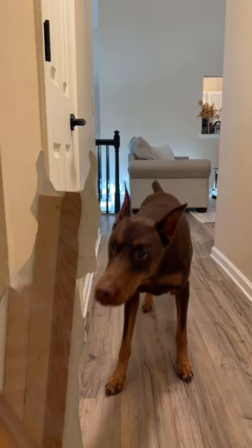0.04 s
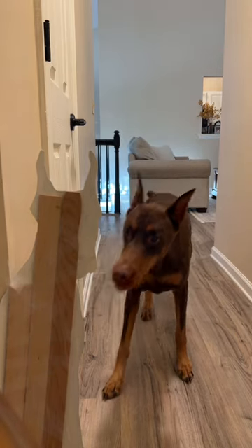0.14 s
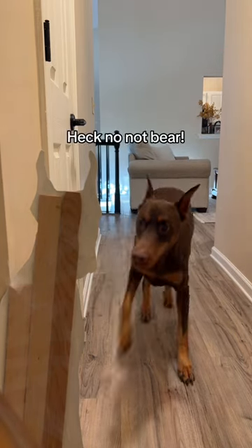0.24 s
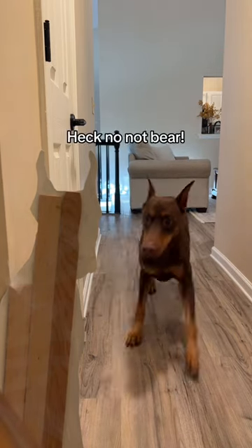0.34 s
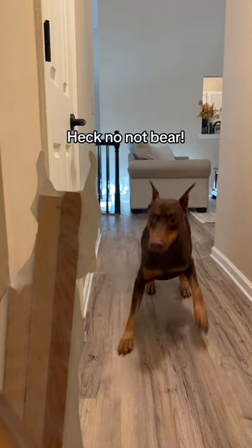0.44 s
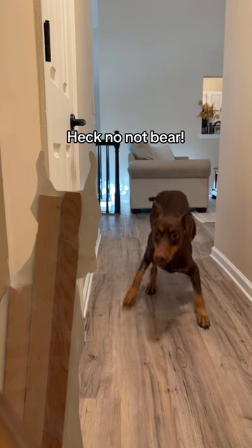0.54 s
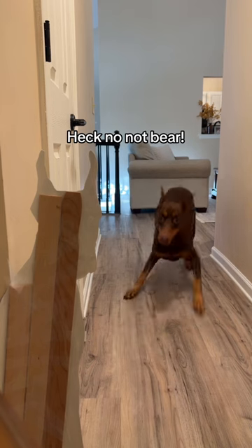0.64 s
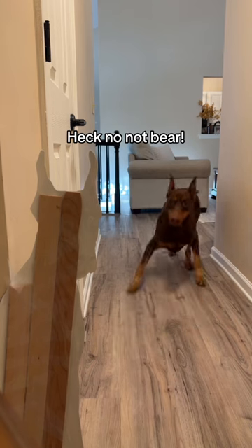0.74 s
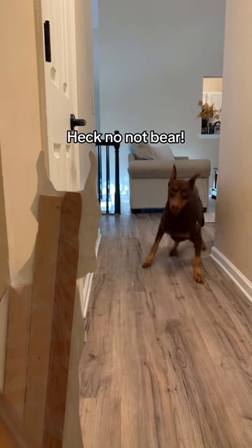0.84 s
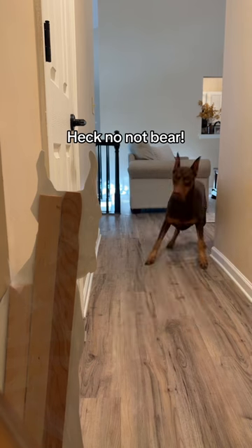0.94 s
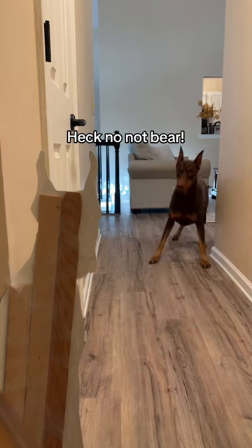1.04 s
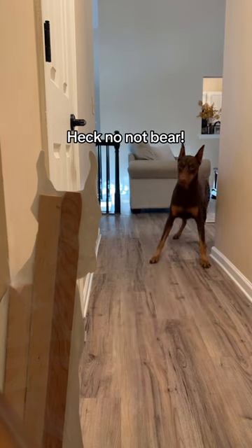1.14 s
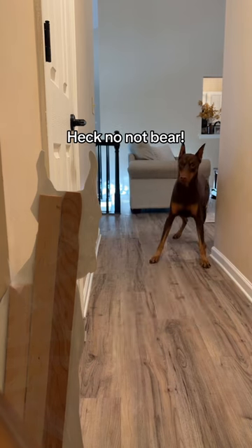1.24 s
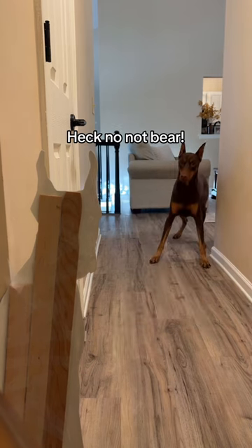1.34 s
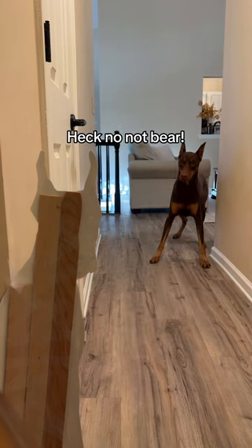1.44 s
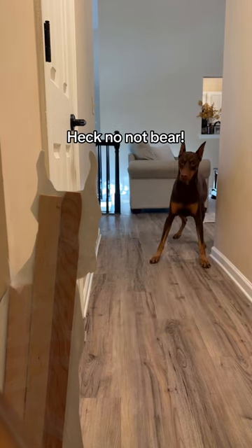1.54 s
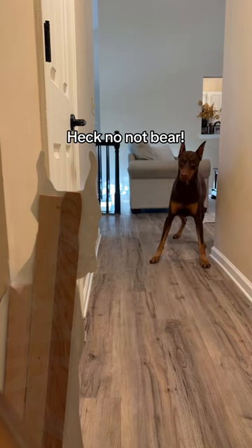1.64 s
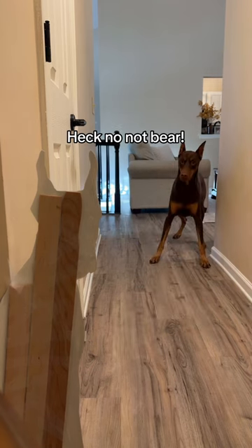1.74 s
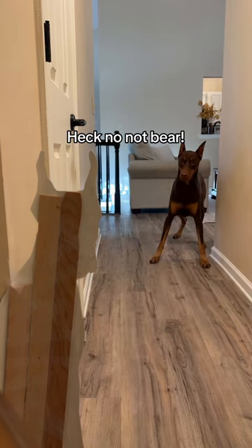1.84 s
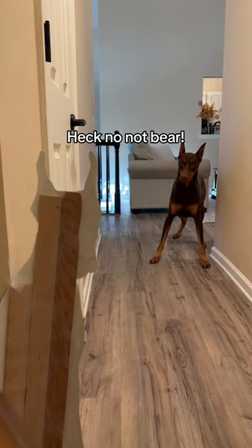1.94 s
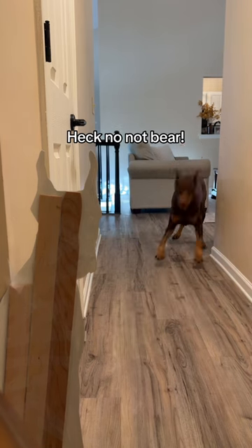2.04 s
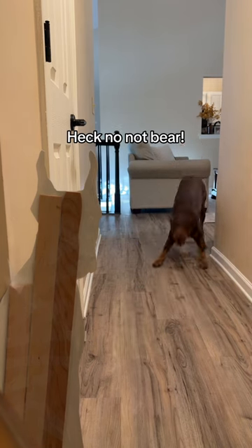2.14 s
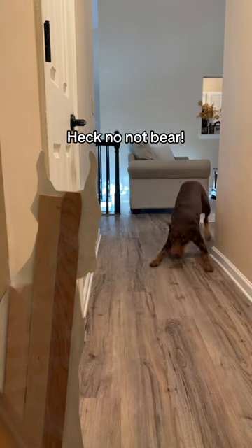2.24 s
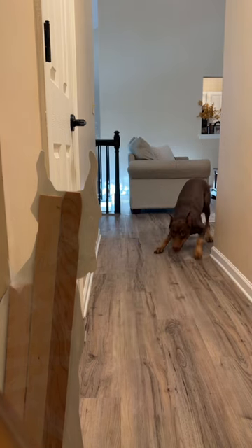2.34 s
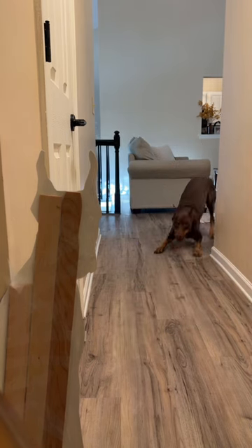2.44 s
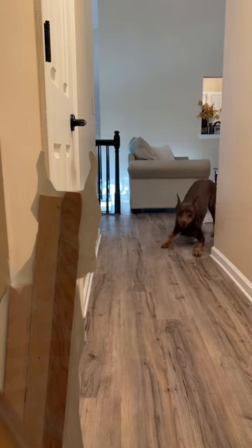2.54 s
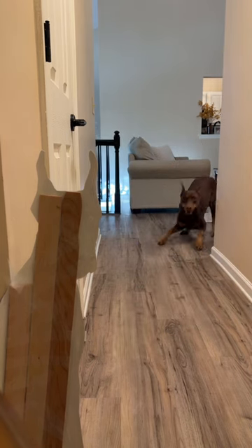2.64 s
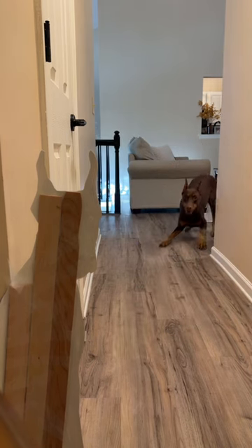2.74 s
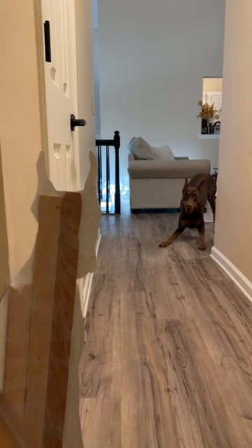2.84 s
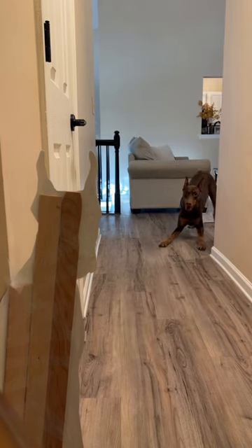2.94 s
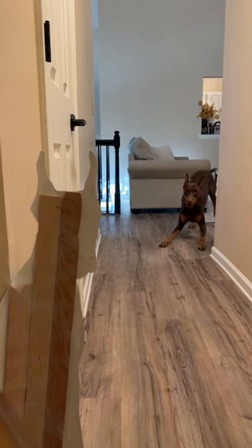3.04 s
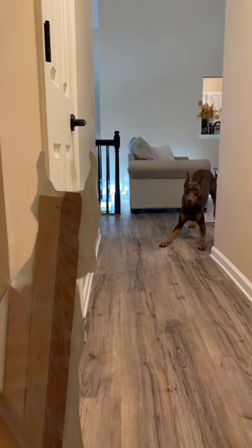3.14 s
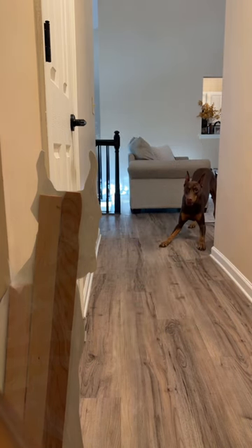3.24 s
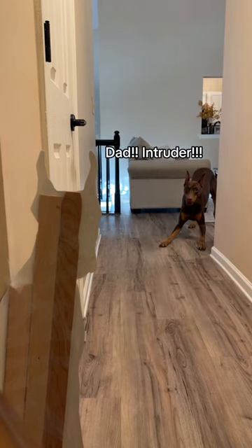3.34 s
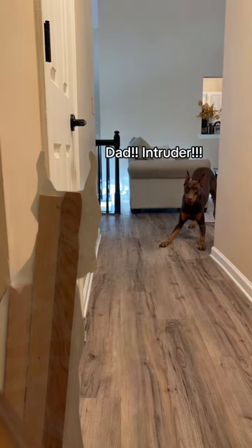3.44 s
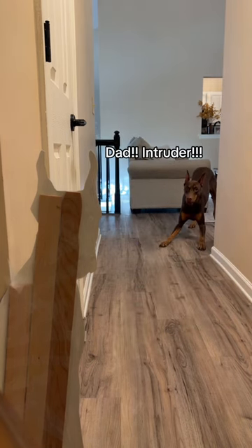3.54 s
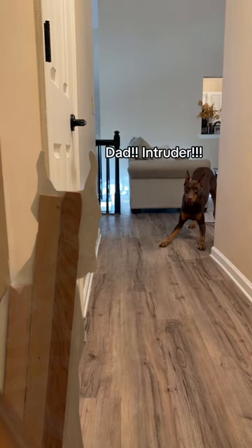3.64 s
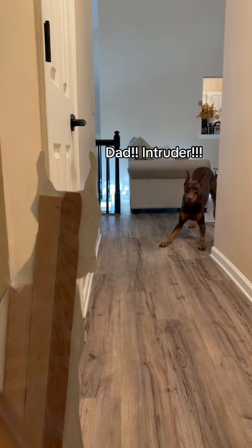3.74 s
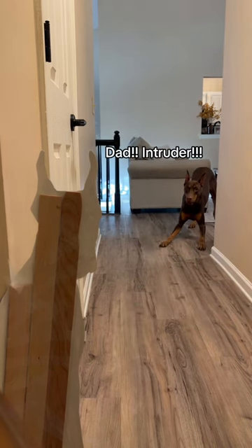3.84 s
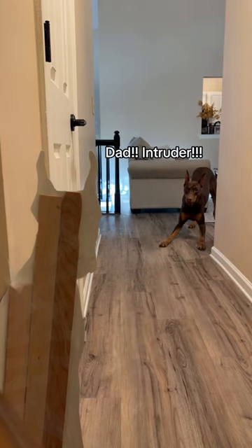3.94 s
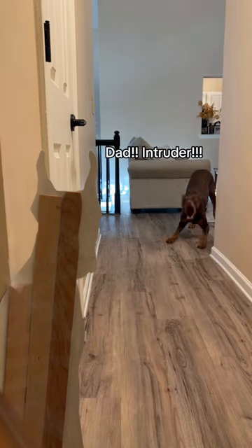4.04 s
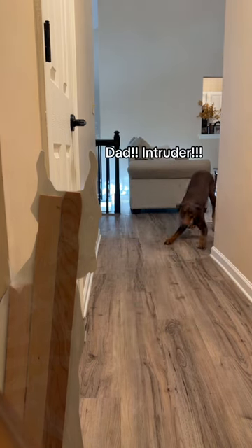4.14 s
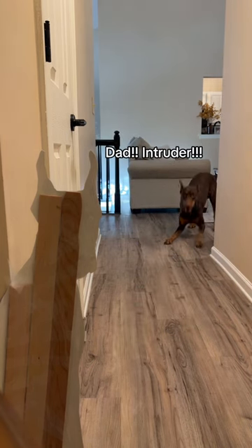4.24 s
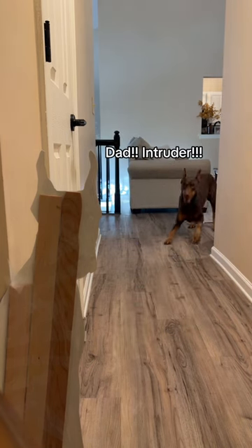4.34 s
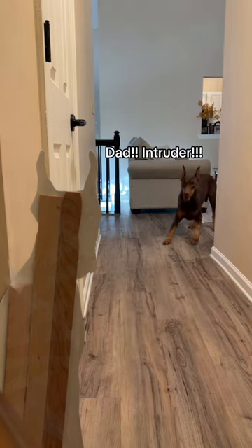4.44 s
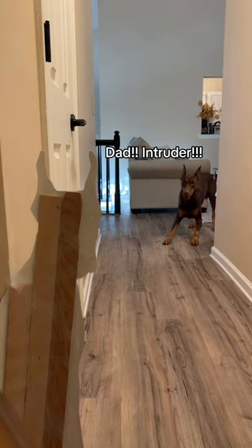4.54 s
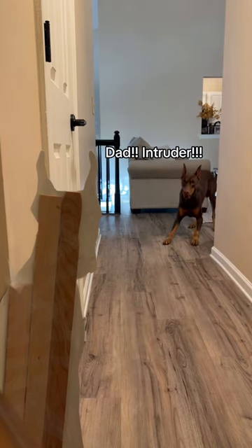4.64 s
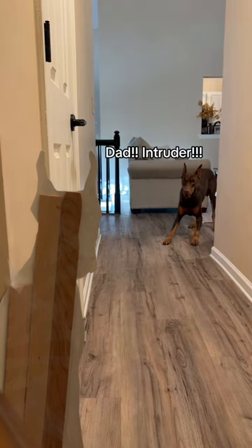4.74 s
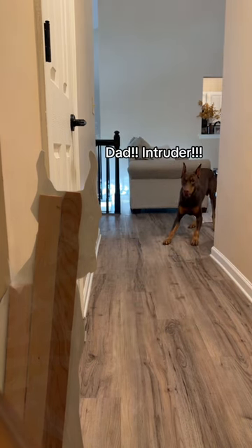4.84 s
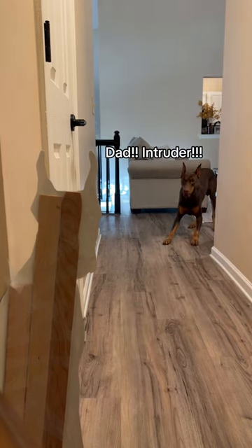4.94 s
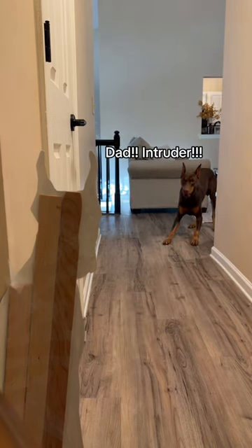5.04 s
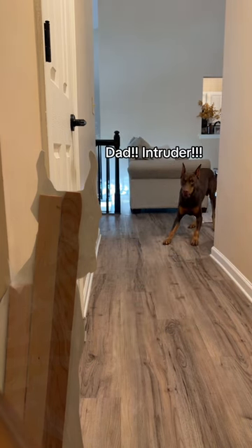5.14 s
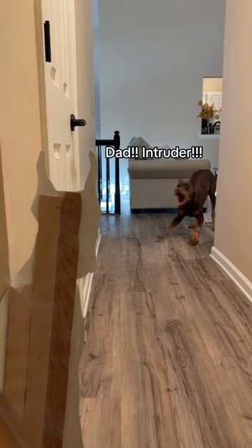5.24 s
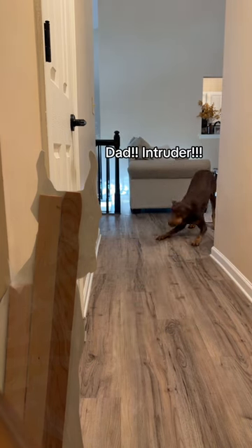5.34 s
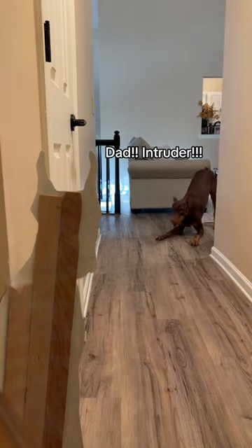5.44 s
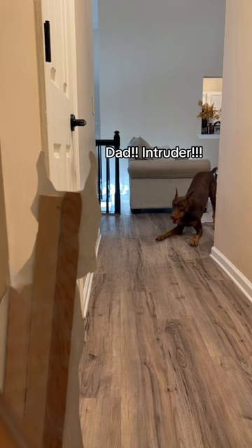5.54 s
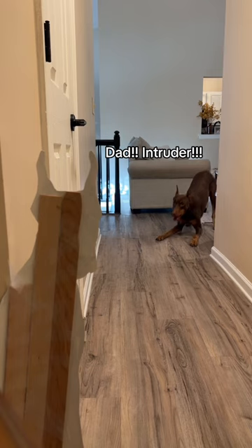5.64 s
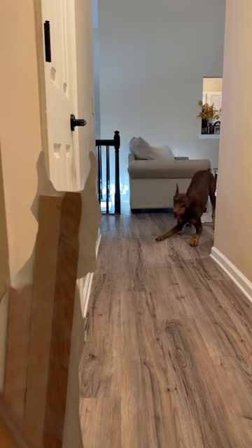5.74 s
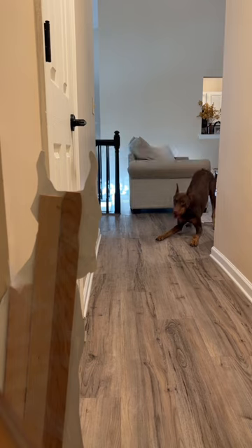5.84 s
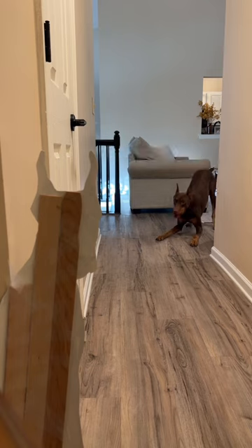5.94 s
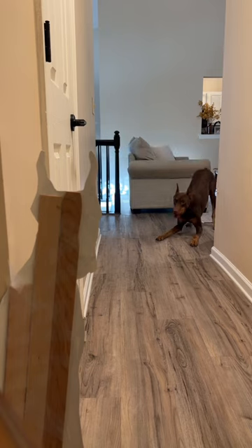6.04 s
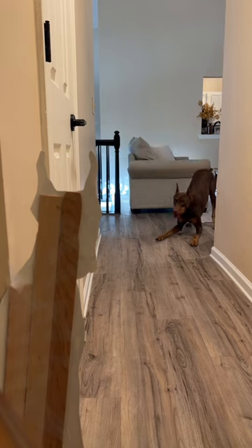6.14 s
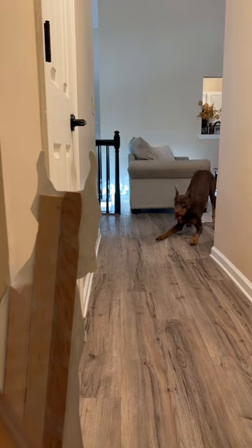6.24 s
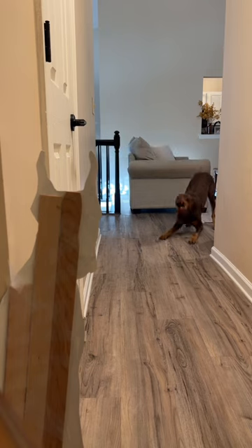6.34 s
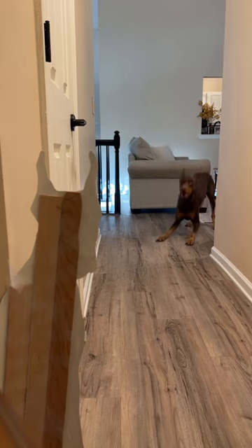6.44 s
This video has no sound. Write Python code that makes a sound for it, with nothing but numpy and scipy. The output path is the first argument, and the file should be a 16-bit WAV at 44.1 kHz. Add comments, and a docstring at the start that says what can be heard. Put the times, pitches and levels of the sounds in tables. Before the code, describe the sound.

Claws clatter and scrape across hallway planks, then a large dog gives four short, deep single barks with a quiet huff after the first.

```python
"""Claws clatter, nails scrape and paws thud as a large dog scrambles over hallway planks: shaped noise and
floor modes. A deep bark follows, a growl breaking into a note; then a huff of fluttering noise amid another
shuffle. Faint duct noise and fan tones hold steady; as the second of four single barks comes, the background
drops lower. The hall answers each voice at once with reflections and a short ring; the living room rings on."""
import sys
import numpy as np
from scipy import signal
from scipy.fft import rfft, irfft, next_fast_len
from scipy.io import wavfile
from scipy.ndimage import uniform_filter1d, minimum_filter1d, map_coordinates

SR = 44100
rng = np.random.default_rng(int(sys.argv[2]) if len(sys.argv) > 2 else 0)


def int16_out(signal):
    """Quantize to a 16-bit WAV file."""
    q = np.round(np.clip(np.atleast_2d(signal).T, -1, 1) * 32767)
    wavfile.write(sys.argv[1], SR, q.astype(np.int16))


N = 286853

# Barks, a growl that breaks upward into a note. Each row: time of full growl in seconds, growl length in
# seconds, note length in seconds, attack in dB/s, release in dB/s, initial growl pitch in Hz, note pitch in Hz,
# relative growl level in dB, relative note level in dB, growl roughness 0-1,
# time from break to the middle of the clearing in seconds, jaw opening 0-1.
BARKS = [(2.052, .031, .055, 1602, 474, 174.4, 383.9, -15, -14, .25, 0.013, .9),
         (4.003, .031, .068, 1106, 479.5, 236, 377, -16.5, -13.5, .72, .034, 0.93),
         (5.201, .035, .036, 878.5, 289, 209.9, 373.7, -15, -15, 0.4, 0.008, 0.86),
         (6.263, .025, 0.047, 901, 382, 222.1, 363, -17.5, -14.5, 0.49, .008, 0.66)]
# Resonances of each bark. Each row: shut throat as (Hz, dB) pairs, open mouth as (Hz, dB) pairs,
# hiss level in dB, puff level in dB, both relative to the voice.
BARK_COLOURS = [
    ([(180, 11), (400, 3), (750, 1.7), (2450, 7.3)], [(760, 0.8), (1150, 1), (4550, 8)], -23.5, -31.5),
    ([(180, 4.4), (550, 7.5), (900, 1), (2250, 6)], [(750, 0.84), (1150, 4.5), (4400, 15)], -23.5, -49.5),
    ([(180, -10.5), (500, 14), (880, 11)], [(520, 6), (1130, 2.3), (1450, 5.2)], -22.5, -37.5),
    ([(180, 1.4), (590, 12.0), (960, 15.4)], [(1120, 1.4), (1450, 9.4)], -23, -45),
]
# Throat with the jaw nearly shut. Each row: frequency in Hz, relative level in dB.
SHUT_SPECTRUM = [(40, -36.5), (110, -18.5), (180, -15.5), (270, -18.5), (380, -0.5), (520, 2), (680, -7.5),
                 (900, -4.5), (1250, -14), (1750, -10), (2350, -30.5), (3300, -37), (4800, -31.5),
                 (6500, -38), (9000, -56)]
# Throat with the jaw wide open. Each row: frequency in Hz, relative level in dB.
OPEN_SPECTRUM = [(70, -31.5), (200, -36), (280, -17.5), (370, -14.5), (550, -3), (750, 1.5), (1120, -3.5),
                 (1500, -3.5), (1850, -18.5), (2500, -30.5), (3000, -27), (3600, -31.5), (4450, -36.5),
                 (9000, -53.5)]
# Air past the teeth. Each row: frequency in Hz, relative level in dB.
HISS_SPECTRUM = [(1000, -35), (2200, -8.5), (2550, -2), (2750, 1), (3050, 1), (3600, -3), (4050, -2.5),
                 (4450, 2.5), (5300, -3.5), (6100, -2), (7400, -8), (9500, -19.5), (12000, -32),
                 (15500, -30.5)]
# Air forced through the half-shut jaw. Each row: frequency in Hz, relative level in dB.
RASP_SPECTRUM = [(1200, -32.5), (2300, -0.5), (3300, -9), (4600, -4.5), (5500, -3), (6800, -14.5),
                 (10000, -27.5), (15500, -36)]
# Air leaving the mouth. Each row: frequency in Hz, relative level in dB.
GUST_SPECTRUM = [(25, -22.5), (80, 3), (150, -0.5), (400, -30.5), (2000, -75)]
# Huff through the lips. Each row: frequency in Hz, relative level in dB.
MUZZLE_SPECTRUM = [(200, -27), (420, -8.5), (650, -3), (900, -6), (1150, 7), (1320, 0), (1550, -8.5),
                   (1880, -16), (2060, -2.5), (2350, -14.5), (4500, -18.5), (8000, -26), (12000, -50.5)]
# Claws striking the planks. Each row: start in seconds, relative level in dB, length in seconds,
# brightness in dB per octave, knock of the plank in dB.
CLAWS = [(0.082, -42.5, 0.057, 21, -10), (0.19, -35, .02, -0.5, 4), (0.226, -29, .036, -3, -20.5),
         (0.299, -17, 0.026, 2.5, 11), (0.338, -18.5, 0.021, 2.5, 20.5), (0.449, -14, 0.013, 1, 7),
         (0.573, -24.5, .017, 2, 9), (0.668, -20, 0.025, -0.5, -0.5), (0.947, -26, 0.026, -2, -2.5),
         (1.971, -47.5, .04, 0.5, 14), (2.026, -39.5, 0.033, -6, -3), (2.091, -28, .012, 0.5, 10),
         (2.252, -46, .02, 4.5, -4), (2.418, -40.5, 0.038, -0.5, 7), (2.707, -34.5, .03, -3.5, -3),
         (2.732, -31.5, 0.036, 1, 1), (2.769, -29, 0.014, 2, 11.5), (2.841, -34, .025, -1, -0.5),
         (3.967, -53, .03, 2.5, 9), (4.389, -54, 0.011, -5, 0), (4.487, -56.5, 0.015, -6, 5)]
# A nail on wood. Each row: frequency in Hz, relative level in dB.
CLICK_SPECTRUM = [(120, -28.5), (200, -6), (525, -10.5), (1110, -4.5), (1780, -2), (2090, -4.5), (3550, -2),
                  (5800, -5), (6960, -0.5), (10800, -22.5), (15500, -26)]
# Claws sliding between the steps. Each row: time of full strength in seconds, hold in seconds, level in dB.
SLIDES = [(0.124, .135, -48), (.35, 0.057, -36.5), (.6, 0.089, -39.5), (0.731, 0.15, -33.5),
          (2.48, 0.29, -53.5), (2.87, 0.056, -48)]
# Nails sliding on wood. Each row: frequency in Hz, relative level in dB.
GRAIN_SPECTRUM = [(180, -47), (300, -19), (423, -15), (515, -19), (637, -17.5), (1440, -1.5), (1540, -6),
                  (2440, -1.5), (2690, -0.5), (3170, -4), (6950, -4), (10600, -24), (15000, -31.5)]
# Paws landing. Each row: start in seconds, relative level in dB.
PAWS = [(0.187, -43.5), (0.307, -29.5), (0.353, -28.5), (0.453, -40.5), (0.677, -40), (2.467, -44),
        (2.49, -42), (2.717, -43.5), (2.781, -54), (4.487, -57.5)]
# Thud of the floor. Each row: frequency in Hz, relative level in dB.
PLANK_SPECTRUM = [(20, -19.5), (60, -3.5), (90, 4.5), (125, -2.5), (200, -3.5), (350, -13), (800, -37),
                  (3000, -83)]
# Floor modes. Each row: frequency in Hz, mean relative level in dB, 60 dB decay time in seconds.
JOISTS = [(36, -10.5, .2), (62, -3, .25), (80.7, -0.5, 0.26), (145, -10, 0.6), (192.6, -10.5, 0.11)]
# Reflections from the walls. Each row: delay in seconds, gain relative to the direct sound.
WALLS = [(.0023, 0.19), (.0052, 0.17), (.0087, 0.13), (0.0132, 0.48), (0.0224, 0.13), (.037, 0.23),
         (.08, .07), (.15, 0.027)]
# Ring of the hallway. Each row: frequency in Hz, 60 dB decay time in seconds.
HALL_T60 = [(100, 0.31), (500, 0.17), (1500, .28), (4000, 0.31), (8000, 0.3), (15000, 0.08)]
# Ring of the living room. Each row: frequency in Hz, 60 dB decay time in seconds.
LOUNGE_T60 = [(100, 0.5), (400, 0.56), (750, 0.66), (1100, .7), (1500, 0.77), (2100, 0.78), (4500, 0.63),
              (7000, 0.63), (15000, .3)]
# Air in the duct. Each row: frequency in Hz, relative level in dB.
DUCT_SPECTRUM = [(15, -41), (25, -14.5), (69, 1), (112, -12), (219, -6.5), (363, -15), (415, -12.5),
                 (543, -13), (655, -8), (790, -9.5), (903, -12), (4040, -23), (6720, -31.5), (10600, -49.5),
                 (15000, -62)]
# Fan tones. Each row: frequency in Hz, level in dB before the common gain of the tones.
FAN_TONES = [(414.5, -62.5), (656.8, -60.5), (904.4, -66.5)]

TOP_HZ = 15750
SCOOP_HZ_PER_S = 1200  # the growl rises as the pressure builds
# at the break the pitch jumps; the voice weakens and cracks
BREAK_S, BREAK_DIP_DB, BREAK_ROUGH = .009, 4.5, .3
JAW_S, NOTE_ROUGH = .007, 0.082  # time constant of the jaw's drop; roughness of the clear note
SAG_HZ_PER_S, FRAY_PER_S = 650, 5.5  # once the push ends: pitch fall, roughness growth
FADE_S, CLOSE_DB_PER_S = .06, 899.5  # after the fade the throat closes
HUFF_S, HUFF_DB, HUFF_HOLD_S = 2.577, -31, 0.015
HUFF_ATTACK_DB_PER_S, HUFF_RELEASE_DB_PER_S = 590, 207
SLIDE_ATTACK_DB_PER_S, SLIDE_RELEASE_DB_PER_S = 449.5, 169
AIR_DB, SINK_START_S, SINK_LENGTH_S, SINK_DB = -53.5, 3.93, 0.6, 18


def barks():
    """Four barks, each with its own throat and mouth resonances."""
    track = np.zeros(N)
    for row, (throat, mouth, hiss_db, puff_db) in zip(BARKS, BARK_COLOURS):
        track += bark(row, throat, mouth, hiss_db, puff_db)
    return track


def bark(row, throat, mouth, hiss_db, puff_db, jitter=0.046, shimmer_db=5, doubling=0.55, breath=1.0):
    """A gruff low start breaks upward into a clear note as the jaw drops."""
    t, pitch_hz, db, rough, jaw = gesture(row)
    unsteady = 1 + jitter * rough * wobble(260, t) + 0.0095 * wobble(90, t)
    phase = 2 * np.pi * np.cumsum(pitch_hz * unsteady) / SR
    folds = sum(np.cos(k * phase) for k in range(1, 21)) / np.sqrt(10)
    # rough folds beat unevenly, strong and weak cycles in turn, and let puffs of air through
    folds = folds * amp(shimmer_db * rough * wobble(220, t)) * (1 + doubling * rough * np.cos(phase / 2))
    air = rng.standard_normal(len(t)) * (1 + 0.24 * np.cos(phase))
    source = np.sqrt(1 - rough) * folds + breath * np.sqrt(rough) * air

    shut = unit(coloured(source, lambda hz: along(SHUT_SPECTRUM, hz) + peaks(hz, throat, width_hz=48)))
    wide = unit(coloured(source, lambda hz: along(OPEN_SPECTRUM, hz) + peaks(hz, mouth, width_hz=75)))
    voice = (1 - jaw) * shut + jaw * wide
    # even out the level so that the gesture alone sets it
    voice /= np.sqrt(np.abs(uniform_filter1d(voice ** 2, size=500)) + 1e-6)

    spit = coloured(air * amp(2.7 * wobble(120, t)), lambda hz: uneven(hz, depth_db=3.5))
    teeth = jaw * shaped(spit, HISS_SPECTRUM)
    rasp = .5 * (1 - jaw) * shaped(spit, RASP_SPECTRUM)
    # the gust that leaves the mouth adds a soft low push
    puff = amp(puff_db) * shaped(air, GUST_SPECTRUM)
    sound = (voice + amp(hiss_db) * (teeth + rasp) + puff) * amp(db - 1.5)
    track = np.zeros(N)
    add(track, t[0], house(sound, hall_db=-4.5, lounge_db=-17))
    return track


def gesture(row):
    """Times, pitch, level, roughness and jaw opening of one bark: growl, break, note, fade."""
    (s, growl_s, note_s, attack_db_per_s, release_db_per_s, growl_hz, note_hz,
     growl_db, note_db, growl_rough, clear_s, opening) = row
    age = np.arange(-SR // 20, SR // 5) / SR
    since_break = age - growl_s
    fading = np.maximum(since_break - note_s, 0)
    risen = passage(since_break / BREAK_S)
    crack = (4 * risen * (1 - risen)) ** 2  # 1 in mid-jump

    scoop_hz = growl_hz + SCOOP_HZ_PER_S * np.clip(age, 0, growl_s)
    sag_hz = SAG_HZ_PER_S * np.minimum(fading, FADE_S)
    pitch_hz = scoop_hz + (note_hz - scoop_hz) * risen - sag_hz

    db = growl_db + (note_db - growl_db) * risen - BREAK_DIP_DB * crack
    db += swell(age, growl_s + note_s, attack_db_per_s, release_db_per_s)
    db -= CLOSE_DB_PER_S * np.maximum(fading - FADE_S, 0)

    cleared = passage((since_break - clear_s) / BREAK_S)
    rough = growl_rough + (NOTE_ROUGH - growl_rough) * cleared
    rough += BREAK_ROUGH * crack + FRAY_PER_S * fading
    jaw = opening * passage(since_break / JAW_S)
    return s + age, pitch_hz, db, np.clip(rough, 0, 1), np.clip(jaw, 0, 1)


def huff(flutter_db=4):
    """An unvoiced woof: breath noise with the fluttering level of loose lips."""
    age = np.arange(-SR // 20, SR // 5) / SR
    breath = rng.standard_normal(len(age)) * amp(flutter_db * wobble(170, age))
    air = shaped(breath, MUZZLE_SPECTRUM)
    db = HUFF_DB + swell(age, HUFF_HOLD_S, HUFF_ATTACK_DB_PER_S, HUFF_RELEASE_DB_PER_S)
    track = np.zeros(N)
    add(track, HUFF_S + age[0], house(air * amp(db), hall_db=-3.5, lounge_db=-11.5))
    return track


def claws(t, grain_db=5, knock_hz=650, softness_per_s=9, patchy_db=2, hall_db=0, lounge_db=-15):
    """Each step is a quick cluster of nail ticks that melts into the hall; each step knocks the plank by its
    own amount."""
    track = np.zeros(N)
    age = t[:SR // 6]
    for s, db, length_s, bright, knock_db in CLAWS:
        rise_s = softness_per_s * length_s ** 2  # a dragged paw sets in more gently than a stamped one
        force = (1 - np.exp(-age / rise_s)) * np.exp(-(age / length_s) ** 2)
        ticks = force * unit(rng.standard_normal(len(age)) * amp(grain_db * wobble(900, age)))
        step = amp(hall_db) * tail(HALL_T60, build_s=1.3 * rise_s)
        step += amp(lounge_db) * tail(LOUNGE_T60, build_s=0.077)
        add(step, 0, 0.43 * ticks / np.linalg.norm(ticks))

        def colour_db(hz):
            tilt = bright * np.log2(np.clip(hz, 300, 8000) / 3000)
            knock = peaks(hz, [(knock_hz, knock_db)], width_hz=750)
            # every step meets a different spot of the floor, with its own small resonances
            return along(CLICK_SPECTRUM, hz) + tilt + knock + uneven(hz, patchy_db)

        step = coloured(step, colour_db)
        add(track, s, amp(db + 4.0) * np.linalg.norm(force) * step / np.linalg.norm(step))
    return track


def scraping(t, catch_db=3, patchy_db=2):
    """Between the steps the nails catch and slide along the grain, their colour shifting as they go."""
    z = signal.stft(rng.standard_normal(N), nperseg=512)[2]
    patches = uniform_filter1d(rng.standard_normal(z.shape), size=5, axis=0)
    patches = uniform_filter1d(patches, size=10, axis=1)
    slide = signal.istft(z * amp(patchy_db * unit(patches)), nperseg=512)[1][:N]
    strokes_db = [db + swell(t - s, hold_s, SLIDE_ATTACK_DB_PER_S, SLIDE_RELEASE_DB_PER_S)
                  for s, hold_s, db in SLIDES]
    catching = slide * amp(catch_db * wobble(400, t))
    return amp(np.max(strokes_db, axis=0)) * shaped(catching, GRAIN_SPECTRUM)


def paws(t, life_s=0.072, thud_db=-3):
    """The dog's weight thuds on the planks and sets the joists ringing."""
    track = np.zeros(N)
    age = t[:SR // 2]
    for s, db in PAWS:
        ring = np.zeros(len(age))
        for hz, mode_db, t60_s in JOISTS:
            decay_db = mode_db + rng.normal(0, 1.4) - 60 * age / t60_s
            ring += amp(decay_db) * np.sin(2 * np.pi * hz * age)
        thud = amp(thud_db) * shaped(rng.standard_normal(len(age)), PLANK_SPECTRUM) * np.exp(-age / life_s)
        add(track, s, amp(db) * (ring + thud) * (1 - np.exp(-age / 0.0017)))
    return track


def house(x, hall_db, lounge_db, scatter_hz=2500):
    """Direct sound, wall reflections, the hallway's short ring and the living room's long one."""
    rings = amp(hall_db) * tail(HALL_T60, build_s=0.0015) + amp(lounge_db) * tail(LOUNGE_T60, build_s=0.077)
    out = signal.fftconvolve(x, rings)
    direct = x / np.sqrt(1 + sum(gain ** 2 for _, gain in WALLS))
    add(out, 0, direct)
    # door frames scatter the treble, so the distinct reflections are dull
    dull = signal.sosfilt(signal.butter(2, scatter_hz, fs=SR, output="sos"), direct)
    for delay_s, gain in WALLS:
        add(out, delay_s, gain * dull)
    return out


def tail(t60_points, build_s):
    """Diffuse sound of energy 1 that builds up; each frequency dies at its own speed."""
    hz, t, z = signal.stft(rng.standard_normal(SR * 4 // 5), SR, nperseg=256)
    decay_db = -60 * t / along(t60_points, hz)[:, None]
    ring = signal.istft(z * amp(decay_db), SR, nperseg=256)[1]
    ring *= 1 - np.exp(-np.arange(len(ring)) / SR / build_s)
    return ring / np.linalg.norm(ring)


def ventilation(t, tones_gain_db=52):
    """Duct noise with a few fuzzy, wavering fan tones: steady, then the whole background drops to a lower
    level."""
    tones = np.zeros(N)
    for hz, db in FAN_TONES:
        waver = wobble(35, t) + 1j * wobble(35, t)
        tones += amp(db + tones_gain_db) * np.real(waver * np.exp(2j * np.pi * hz * t))
    sunk = np.clip((t - SINK_START_S) / SINK_LENGTH_S, 0, 1)
    return amp(AIR_DB - SINK_DB * sunk) * (shaped(rng.standard_normal(N), DUCT_SPECTRUM) + tones)


def amp(db):
    """Decibels to gain."""
    return 10 ** (np.asarray(db) / 20)


def unit(x):
    """Scale to rms 1."""
    return x / np.sqrt(np.mean(x ** 2) + 1e-20)


def along(points, hz):
    """Read (Hz, value) points on a log axis."""
    f, v = np.transpose(points)
    return np.interp(np.log(hz + 1), np.log(f), v)


def wobble(knots_per_s, t):
    """A smooth random curve through evenly spaced knots."""
    knots = (t - t[0]) * knots_per_s
    return map_coordinates(rng.standard_normal(4096), [knots], mode="wrap")


def coloured(x, gain_db):
    """x through a causal minimum-phase filter whose gain in dB is a function of frequency."""
    size = 8192
    cepstrum = irfft(gain_db(np.fft.rfftfreq(size, 1 / SR)) * np.log(10) / 20)
    # fold the cepstrum onto positive time
    cepstrum[1:size // 2] *= 2
    cepstrum[size // 2 + 1:] = 0
    return signal.fftconvolve(x, irfft(np.exp(rfft(cepstrum))))[:len(x)]


def shaped(x, spectrum):
    """x with the colour of a (Hz, dB) spectrum, at rms 1."""
    return unit(coloured(x, lambda hz: along(spectrum, hz)))


def peaks(hz, resonances, width_hz):
    """Gain in dB of a few (Hz, dB) resonances."""
    return sum(db / (1 + ((hz - centre_hz) / width_hz) ** 2) for centre_hz, db in resonances)


def uneven(hz, depth_db):
    """Small chance resonances, a few hundred Hz apart: gain in dB."""
    bumps_db = depth_db * rng.standard_normal(size=64)
    return np.interp(hz, np.linspace(0, TOP_HZ, len(bumps_db)), bumps_db)


def swell(age, hold_s, attack_db_per_s, release_db_per_s):
    """Attack, hold and release in dB: full from age 0 for the hold, straight slopes either side."""
    return -attack_db_per_s * np.maximum(-age, 0) - release_db_per_s * np.maximum(age - hold_s, 0)


def passage(x):
    """A smooth passage from 0 to 1 around x = 0."""
    return (1 + np.tanh(x / 2)) / 2


def add(track, s, sound):
    """Mix a sound into the track from time s in seconds."""
    part = track[max(round(s * SR), 0):][:len(sound)]
    part += sound[:len(part)]


def scene():
    """Voice and feet in the house, over the ventilation."""
    t = np.arange(N) / SR
    return (barks() + huff() + claws(t) + scraping(t) + paws(t) + ventilation(t))[None]


def record(dry, ceiling=.47):
    """A limiter holds down the peaks, then everything from TOP_HZ up is cut."""
    needed = np.minimum(1, ceiling / (np.abs(dry) + 1e-9))
    gain = uniform_filter1d(minimum_filter1d(needed, size=200), size=150)
    size = next_fast_len(N + SR // 2)
    kept = np.fft.rfftfreq(size, 1 / SR) < TOP_HZ
    return irfft(rfft(dry * gain, size) * kept, size)[..., :N]


dry = scene()
out = record(dry)
int16_out(out)
```